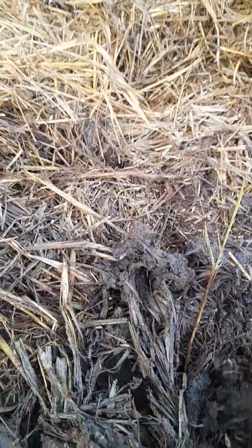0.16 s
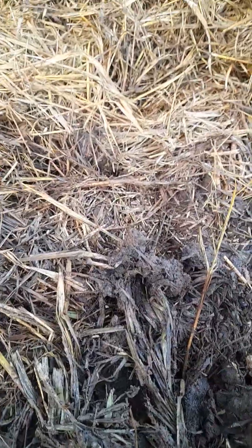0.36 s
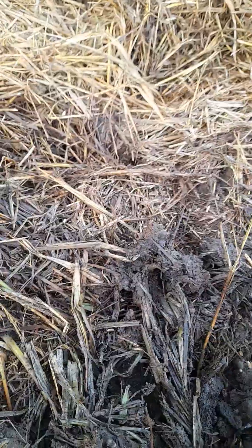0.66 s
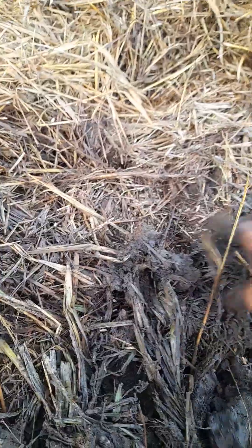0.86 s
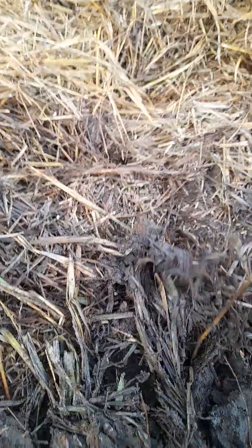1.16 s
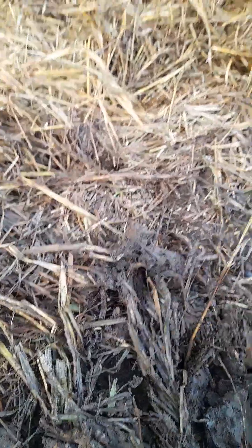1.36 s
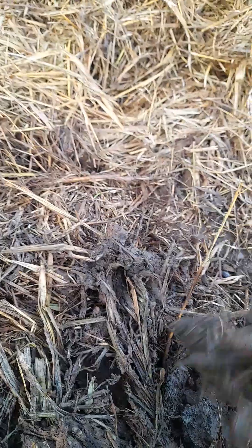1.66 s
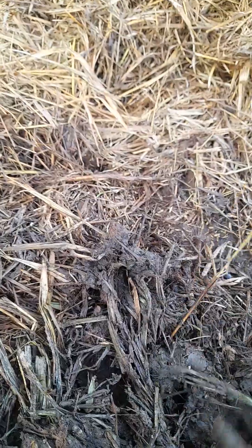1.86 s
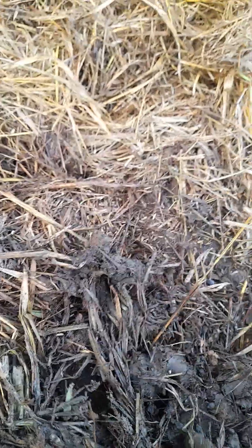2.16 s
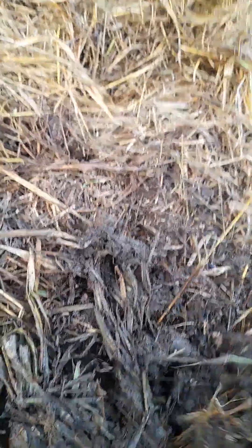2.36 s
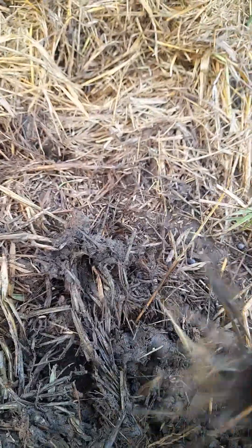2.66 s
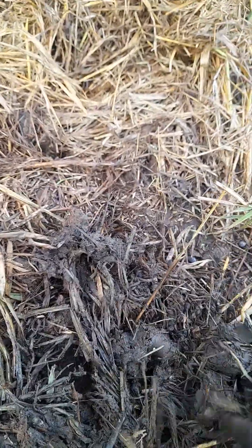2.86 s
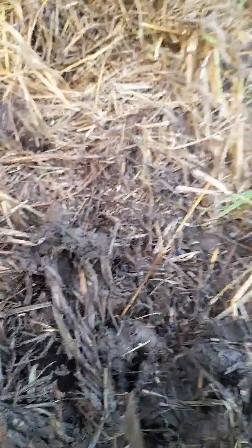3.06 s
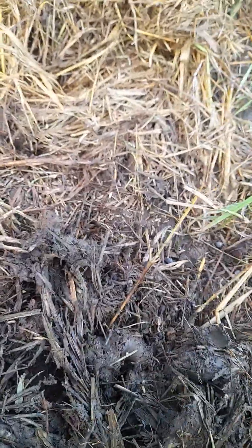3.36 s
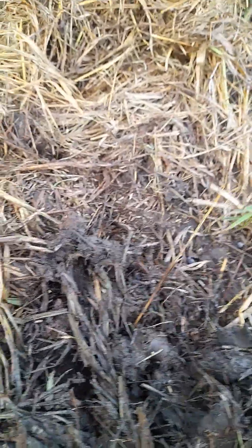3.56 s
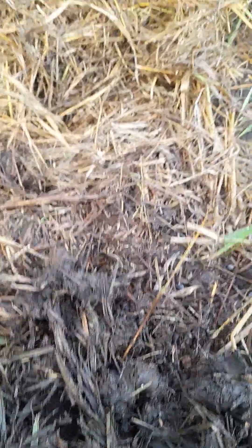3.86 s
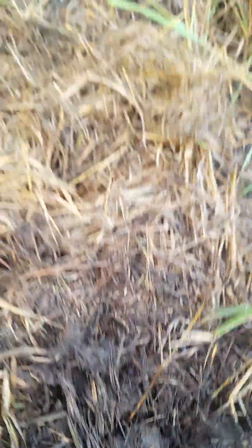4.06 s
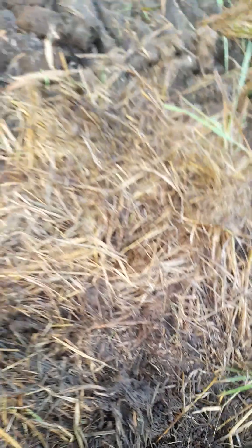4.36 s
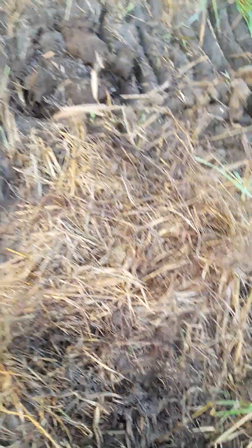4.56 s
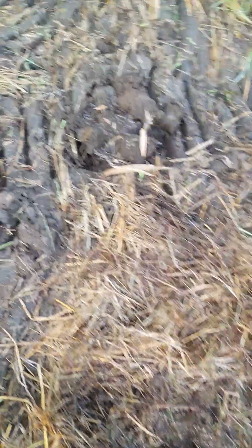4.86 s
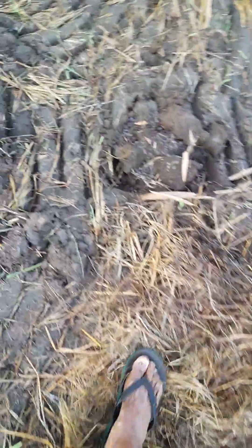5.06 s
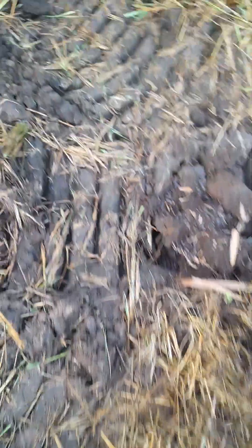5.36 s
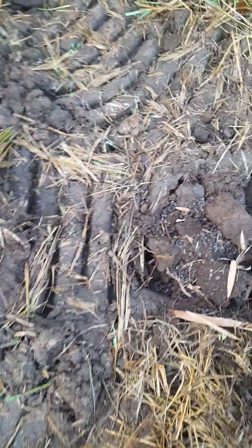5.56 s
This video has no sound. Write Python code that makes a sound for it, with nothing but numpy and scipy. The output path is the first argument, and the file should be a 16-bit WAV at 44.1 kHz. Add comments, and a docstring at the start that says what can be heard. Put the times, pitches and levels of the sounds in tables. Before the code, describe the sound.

Crickets chirp over a faint low engine rumble in a harvested field while muddy straw rustles close by, then stalks snap sharply underfoot.

```python
"""Harvested rice field with crickets and straw

Crickets chirp all around (falling pulse trains and shaped noise) over a far engine (noise and tones).
Someone crouching close by handles muddy straw (shaped noise, ticks, stick-slip resonances), then
steps away; dry stalks snap underfoot and mud pops (struck resonators). Thin squeaks (gliding sines)
and narrow bands of noise (modulated sines) swell and fade faintly."""
import sys
import numpy as np
from scipy import signal
from scipy.fft import rfft, irfft
from scipy.io import wavfile
from scipy.ndimage import uniform_filter1d

SR = 44100
rng = np.random.default_rng(int(sys.argv[2]) if len(sys.argv) > 2 else 0)


def output_pcm(signal):
    """Save a mono or channel-first signal as 16-bit PCM at the path in sys.argv[1].

    Samples are clipped to [-1, 1] before scaling.
    """
    pcm = np.clip(np.atleast_2d(signal).T, -1, 1) * 32767
    wavfile.write(sys.argv[1], SR, np.round(pcm).astype(np.int16))


N = 251456
TIME = np.arange(N) / SR

# In all tables a balance is left minus right; spectra are relative density levels.
# Far rumble, with brief dips, lower once the walk begins: t/s, level/dB
RUMBLE = [(0.0, -47.5), (.66, -44.5), (.83, -51), (.98, -46.5), (2.82, -46.5), (2.96, -50), (3.1, -46.5),
          (3.78, -46), (4.05, -48.5), (5.7, -49)]
# Spectrum of the rumble: f/Hz, density level/dB
RUMBLE_COLOUR = [(25, -57), (31, -41), (39, -9.5), (48, -14), (70, -4), (95, -9), (124, 1), (160, -4.5),
                 (210, -7), (290, -19), (380, -27), (550, -37), (900, -64), (2000, -63.5)]
# Engine tones before their swell: f/Hz, relative level/dB
ENGINE_TONES = [(124, -58), (263.5, -65.5), (330, -67), (397, -82), (463, -77)]
# Swell shared by the engine's tones and wash: t/s, gain/dB
ENGINE_SWELL = [(0, 5.5), (1.2, -0.5), (2.35, 5), (3.1, -4.5), (5.7, -12.5)]
# Spectrum of the engine's diffuse wash: f/Hz, density level/dB
WASH_COLOUR = [(60, -18), (150, -5.5), (300, 12), (390, -3), (500, -3.5), (700, -34), (1500, -25.5)]

# Faint narrow bands of noise that swell and fade: t/s, half length/s, f/Hz, relative level/dB
NOISE_BANDS = [(0.447, 0.17, 2580, -78), (0.89, 0.27, 2264, -84), (1.367, 0.096, 2420, -78),
               (1.707, 0.29, 2890, -75.5), (2.03, 0.11, 1430, -96), (2.895, 0.1, 1387, -84.5),
               (2.938, 0.084, 2930, -75.5), (3.337, 0.22, 2990, -73), (3.844, 0.19, 2850, -75),
               (4.32, 0.11, 2240, -71.5)]
# Thin squeaks: t/s, length/s, start f/Hz, middle f/Hz, end f/Hz, level/dB
SQUEAKS = [(3.255, 0.11, 8420, 9770, 9730, -66.5), (3.467, 0.095, 9820, 9710, 9740, -64),
           (3.49, 0.09, 12800, 12600, 12330, -71), (3.575, 0.04, 9300, 9200, 9500, -63),
           (3.625, 0.05, 9450, 9750, 9980, -66), (3.668, 0.072, 10500, 11380, 10850, -61),
           (5.254, 0.017, 6950, 7280, 7200, -51), (5.335, 0.097, 11200, 12000, 13500, -66),
           (5.415, 0.072, 13450, 13000, 11700, -63), (5.405, 0.075, 11200, 11700, 10800, -69)]
SQUEAK_QUIVER = .009  # rms share of the pitch

# Blurred far crickets: t/s, relative level/dB
CHORUS = [(0.0, -64.5), (1.82, -62), (2.43, -62.5), (4.3, -62.5), (4.78, -59), (5.24, -59.5), (5.7, -58)]
# Spectrum of the far crickets: f/Hz, density level/dB
CHORUS_COLOUR = [(2500, -56), (4100, -16.5), (4600, -5.5), (5000, -1), (5300, -4), (6000, -21.5),
                 (6900, -13.5), (7400, -18), (8150, -8), (8900, -13.5), (9950, -10.5), (10800, -16),
                 (15000, -60)]
# Near crickets, overlapping as they answer one another: centre of last pulse t/s, pulses/1, f/Hz,
# level/dB, fall as share of pitch/1, echo/dB, balance/dB
CHIRPS = [(0.474, 3, 4980, -61, 0.13, 4, 4), (0.551, 4, 5780, -63, 0.12, 1, 4),
          (0.574, 4, 4970, -61.5, 0.13, 6, 0), (0.642, 3, 4950, -68, 0.15, -5, 10),
          (0.81, 3, 4900, -66.5, 0.026, -3, 10), (1.062, 4, 4600, -56.5, 0.23, -8, 5),
          (1.085, 3, 4900, -60, 0.16, -3, 4), (1.33, 2, 4670, -55, 0.27, -2, 3),
          (1.381, 4, 5150, -59.5, 0.21, 5.5, 7), (1.398, 4, 5600, -61, 0.19, 2, 2),
          (1.567, 3, 4560, -55.5, 0.25, 2.5, 3), (1.671, 2, 4950, -59, 0.17, 5, -1),
          (1.695, 3, 5070, -56, 0.19, 3, 2), (1.706, 3, 4820, -54, 0.22, 1, 0),
          (1.722, 3, 5150, -63, 0.25, 1, -4), (1.834, 2, 4650, -57, 0.26, -6, 5),
          (1.915, 3, 4950, -58, 0.23, 4, 1), (2.125, 1, 4950, -55, 0.24, 3, -5),
          (2.186, 2, 4870, -58.5, 0.25, 3, -7), (2.426, 3, 4830, -58, 0.18, -7, -2),
          (2.448, 3, 5550, -67, 0.2, 6, 5), (2.701, 3, 4880, -63, 0.23, -13, -4),
          (2.808, 3, 4980, -61, 0.12, 0.5, 7), (2.895, 3, 4980, -59, 0.12, -3, 3),
          (2.932, 1, 4960, -64, 0.16, -5, 3), (3.154, 3, 4950, -60, 0.15, -1, 0),
          (3.232, 4, 4620, -60, 0.27, 0, 4), (3.468, 2, 4620, -59, 0.26, 1, 3),
          (3.505, 4, 5730, -65, 0.15, 1, 5), (3.572, 4, 4950, -64.5, 0.14, 6, 3),
          (3.705, 3, 4620, -59.5, 0.26, 8, -1), (3.725, 4, 4950, -62, 0.14, 5, 6),
          (3.915, 3, 4950, -65, 0.076, 7, 7), (4.001, 2, 4600, -57, 0.27, -2, -1),
          (4.008, 2, 5080, -63, 0.17, -2, 2), (4.194, 2, 5130, -63, 0.22, -13, 0),
          (4.26, 2, 4990, -57.5, 0.16, -2, 1), (4.453, 4, 4830, -52, 0.32, -4, -7),
          (4.569, 3, 4950, -56.5, 0.13, 0, -9), (4.612, 1, 5000, -49, 0.18, -1, 3),
          (4.726, 3, 4910, -46.5, 0.26, 4, -6), (4.76, 3, 4920, -56.5, 0.12, 8, 3),
          (4.826, 2, 4950, -55, 0.11, -6, -9), (4.868, 1, 4700, -62, 0.17, -1, -14),
          (4.983, 3, 4700, -51.5, 0.25, -5, -8), (5.001, 4, 4880, -46.5, 0.21, -1, -4),
          (5.222, 3, 4750, -50, 0.29, 0.5, -7), (5.446, 2, 4740, -52.5, 0.27, 4.5, 4),
          (5.464, 3, 4880, -48.5, 0.31, -2.5, -6), (5.567, 4, 5580, -59.5, 0.12, 0, 0),
          (5.686, 1, 4700, -53, 0.19, -2, -8)]
PULSE_GAP_S, PULSE_S = .0335, .022  # onset to onset, pulse length
BUILD_UP_DB = 0.96  # the last pulse but one is this much weaker
WING_RASP = .017  # rms share of the pitch
CRICKET_ECHO_DB = -3.0

# Spectrum of the bright rustle: f/Hz, density level/dB
RUSTLE_COLOUR = [(900, -25), (2200, -12.5), (3400, -6), (4600, -4.5), (6300, -7.5), (6900, -6.5),
                 (7350, -8.5), (8100, -0.5), (8900, -2.5), (10020, 5), (10600, .5), (14200, -.5),
                 (15700, -9)]
# Spectrum of the dull shuffle: f/Hz, density level/dB
SHUFFLE_COLOUR = [(200, 5.5), (500, 2.5), (760, 5.5), (1200, 3), (1700, 4.5), (2300, -2), (3300, -4.5),
                  (6000, -24), (15000, -50)]
# Spectrum of the swish of a stroke: f/Hz, density level/dB
SWISH_COLOUR = [(700, -56), (1600, -14), (2400, -0.5), (3100, -8.5), (4000, -2), (5200, -2.5), (7000, -7),
                (14000, -48)]
# Spells of handling straw: start t/s, end t/s, relative rustle level/dB, relative shuffle level/dB
SPELLS = [(0.0, 0.69, -58, -74), (0.938, 1.727, -63, -85), (1.76, 2.83, -61, -78), (3.015, 3.13, -57, -84),
          (3.277, 3.748, -71.5, -77.5), (4.325, 5.015, -75, -87), (4.982, 5.702, -66, -69)]
SPELL_ATTACK_S, SPELL_RELEASE_S = 0.011, 0.021
REST_DB = -79  # relative level of the faint hiss left between spells
# Quick strokes and flicks: centre t/s, Gaussian half width/s, then the relative levels
# rustle/dB, swish/dB, shuffle/dB
STROKES = [(0.632, 0.0038, -56, -83, -99), (1.04, 0.033, -63.5, -71, -71.5),
           (1.193, 0.0015, -53.5, -97, -90), (1.212, 0.0015, -55.5, -74, -91),
           (1.438, 0.001, -51, -61, -71), (1.487, 0.058, -61, -70.5, -75), (1.671, 0.0084, -59.5, -67, -84),
           (1.763, 0.0052, -89, -65, -77), (2.126, 0.02, -51, -66, -83), (2.265, 0.04, -51.5, -57.5, -73),
           (2.849, 0.021, -55.5, -69, -72), (3.05, 0.014, -54.5, -75, -73), (3.41, 0.022, -59.5, -74, -73),
           (3.713, 0.051, -75, -71.5, -78), (4.05, 0.12, -71.5, -74, -72), (4.422, 0.00069, -66, -80, -90),
           (5.145, 0.043, -53, -67.5, -60), (5.631, 0.036, -53.5, -59.5, -78)]
# Feet shuffling on mud while stepping away: t/s, relative level/dB
FOOTWORK = [(4.2, -70), (4.32, -73), (4.722, -60.5), (5.048, -60.5), (5.298, -73.5), (5.7, -63.5)]
STEP_OFF_S = 0.22  # fade-in of the shuffling
# Muddy stalks dragged past each other, resonance sinking: centre t/s, half length/s, start f/Hz,
# end f/Hz, relative level/dB
SCRAPES = [(1.54, 0.088, 3610, 2950, -67.5), (2.143, 0.023, 5560, 4500, -54.5),
           (2.151, 0.046, 2890, 2525, -66), (2.253, 0.0414, 4380, 3940, -58.5),
           (2.278, 0.045, 2500, 2060, -64)]

# Snapping stalks: t/s, level/dB, own f/Hz, low-pass f/Hz, thud relative to the crack/dB, balance/dB
SNAPS = [(3.931, -30.5, 6950, 14000, -24, -15), (3.9318, -18.5, 1890, 13200, 4.5, -5.5),
         (4.051, -52, 2550, 12000, -30, -15), (4.059, -46, 2650, 12000, -30, -13),
         (4.072, -49, 2550, 13000, -30, -14), (4.08, -40, 2560, 13000, -30, -9),
         (4.091, -32.5, 9900, 16000, -36, -8.5), (4.6053, -29.5, 4000, 6600, -32, -10),
         (4.6305, -21, 4200, 4300, -37, -10.5), (4.6316, -29, 1200, 2520, -25, 4.5),
         (4.753, -36, 2530, 12000, -30, -9)]
# Resonant modes of a stalk: f/Hz, relative level/dB, t60/s
STALK = [(555, -9, 0.008), (1000, -7, 0.005), (2100, -2, 0.003), (3750, -11, 0.004), (5050, -7, 0.003),
         (6900, -12, 0.0028), (8150, -12, 0.003), (10200, -3, 0.0018), (11700, -14, 0.0025),
         (14200, -14, 0.0018)]
# Soft pops of wet mud: t/s, level/dB, f/Hz, t60/s
POPS = [(4.113, -46, 1500, 0.004), (4.524, -44, 1290, 0.045), (5.0688, -30.5, 900, 0.005),
        (5.0702, -35, 1450, 0.003)]
OWN_T60_S, TEAR_SHARE = .0033, 0.13
SNAP_ECHO_DB, SNAP_ECHO_T60_S = -19.0, .08
CUTOFF_HZ = 15900


def from_db(db):
    """Logarithmic level: 20 dB is a tenfold amplitude."""
    return 10 ** (np.asarray(db) / 20)


def rms_one(x):
    """Normalisation to unit mean power."""
    return x / np.sqrt(np.mean(x ** 2) + 1e-20)


def in_time(rows):
    """Linear interpolation of each column of a curve at every sample."""
    s, *columns = np.transpose(rows)
    return [np.interp(TIME, s, c) for c in columns]


def panned(balance_db):
    """Interaural level difference: left and right gains."""
    return from_db(np.array([[.5], [-.5]]) * balance_db)


def add(out, s, sound):
    """Superposition of a sound from time s."""
    start = int(np.clip(round(s * SR), 0, N))
    out[..., start:start + sound.shape[-1]] += sound[..., :N - start]


def drift(rate):
    """Slow random modulation: low-passed Gaussian noise of unit spread, corner in Hz."""
    white = rfft(rng.standard_normal(N))
    return rms_one(irfft(white / (1 + (np.fft.rfftfreq(N, 1 / SR) / rate) ** 4), N))


def coloured(x, colour):
    """Spectral shaping: gain interpolated over log frequency."""
    hz, db = np.transpose(colour)
    bins = np.log(np.fft.rfftfreq(N, 1 / SR) + 1)
    gain_db = np.interp(bins, np.log(hz), db, left=db[0] - 11)
    return irfft(rfft(x) * from_db(gain_db), N)


def air_noise(colour, likeness):
    """Interaural correlation: mid and side noises mix to a given likeness of the ears."""
    mid, side = coloured(rng.standard_normal((2, N)), colour)
    alike = np.clip(likeness, -1, 1)
    return rms_one(np.sqrt(1 + alike) * mid + np.sqrt(1 - alike) * side * [[1], [-1]])


def ring(push, hz, t60):
    """Damped resonator: a unit click excites a decaying sine."""
    r, w = from_db(-60 / (t60 * SR)), 2 * np.pi * hz / SR
    return signal.lfilter([0, np.sin(w)], [1, -2 * r * np.cos(w), r * r], push + 1e-18)


def tone(hz):
    """Phase is the integral of frequency: a sine follows a pitch track."""
    return np.sin(2 * np.pi * np.cumsum(hz) / SR)


def stubble(x, echo_db, t60=0.12):
    """Diffuse scattering: stalks and banks add a decaying tail, different at each ear."""
    t = np.arange(SR // 4) / SR
    tail = rng.standard_normal((2, len(t))) * from_db(-60 * t / t60)
    tail = tail / np.sqrt(np.sum(tail ** 2, axis=1, keepdims=True))  # unit energy
    return x + from_db(echo_db) * signal.fftconvolve(x, tail, axes=1)[:, :x.shape[-1]]


def far_engine(wash_db=-63.0, waver=0.00684, flutter_db=4.0):
    """Propagation over distance: a dull rumble, a diffuse wash and a few wavering tones remain."""
    rumble = from_db(in_time(RUMBLE)[0]) * air_noise(RUMBLE_COLOUR, likeness=0.97)
    engine = from_db(wash_db) * air_noise(WASH_COLOUR, likeness=0.0)
    for hz, db in ENGINE_TONES:
        level = from_db(db + flutter_db * drift(6.2))
        engine = engine + level * tone(hz * (1 + waver * drift(3.83)))
    return (rumble + from_db(in_time(ENGINE_SWELL)[0]) * engine) * panned(balance_db=-2.0)


def noise_bands(width_hz=200):
    """Amplitude modulation: low-passed noise on a sine makes a narrow band that swells and fades."""
    low_pass = signal.butter(2, width_hz, fs=SR, output="sos")
    slow_noise = rms_one(signal.sosfilt(low_pass, rng.standard_normal((2, N))))
    carriers = np.zeros(N)
    for s, half, hz, db in NOISE_BANDS:
        swell = np.exp(-((TIME - s) / half) ** 2)
        carriers += from_db(db) * swell * np.sin(2 * np.pi * hz * TIME)
    return 2 * slow_noise * carriers * panned(balance_db=-2.0)


def squeaks():
    """Frequency modulation: faint, very high whistles curve and quiver in pitch."""
    out = np.zeros(N)
    for s, length, *pitches, db in SQUEAKS:
        u = np.linspace(0, 1, int(length * SR))
        hz = np.polyval(np.polyfit([0, .5, 1], pitches, 2), u)  # parabola through three pitches
        shake = rms_one(uniform_filter1d(rng.standard_normal(len(u)), size=60))
        swell = np.sqrt(np.abs(np.sin(np.pi * u)))
        add(out, s, from_db(db) * swell * tone(hz * (1 + SQUEAK_QUIVER * shake)))
    return stubble(np.array([out, out]), echo_db=-1.0)


def cricket_chorus(blur_db=-2.5):
    """Incoherent superposition: the whole field's crickets blur into shaped, fluctuating noise."""
    level = from_db(in_time(CHORUS)[0] + blur_db + 1.8 * drift(29))
    return level * air_noise(CHORUS_COLOUR, likeness=0.0089) * panned(balance_db=-2.0)


def chirp(hz, fall, count=4):
    """Stridulation: each wing closure's tone falls as the wing slows; strokes build up to the last."""
    u = np.linspace(0, 1, int(PULSE_S * SR))
    out = np.zeros(int(((count - 1) * PULSE_GAP_S + PULSE_S) * SR) + 2)
    for k in range(count):
        teeth = rms_one(uniform_filter1d(rng.standard_normal(len(u)), size=24))
        stroke = np.sin(np.pi * u) ** 2 * tone(hz * (1 + fall * (.5 - u) + WING_RASP * teeth))
        add(out, k * PULSE_GAP_S, stroke * from_db(-BUILD_UP_DB * (count - 1 - k) ** 2))
    return out


def far_crickets(far_db=-67.0, far_fall=0.153, count=50):
    """Interaural time difference: faint chirps at random times, each direction with its own lag."""
    field = np.zeros((2, N))
    starts = rng.uniform(0, N / SR, count)
    for s, (pitch, level, side) in zip(starts, rng.standard_normal((count, 3))):
        call = chirp(5000 + 110 * pitch, far_fall)
        ears = np.array([call, np.roll(call, int(8 * side))])
        add(field, s, from_db(far_db + 2 * level) * ears * panned(4 * side - 2))
    return stubble(field, echo_db=CRICKET_ECHO_DB)


def near_crickets():
    """Direct and scattered sound: every near chirp carries its own share of diffuse tail."""
    near = np.zeros((2, N))
    for last, pulses, hz, db, fall, echo_db, balance in CHIRPS:
        call = chirp(hz, fall, count=max(int(round(pulses)), 1)) * from_db(db)
        padded = np.pad(call, (0, SR // 8))  # room for the tail
        heard = stubble(padded * panned(balance), echo_db=echo_db, t60=0.21)
        add(near, last + PULSE_S / 2 - len(call) / SR, heard)
    return near


def high_cricket(level_db=-67.5, pitch_hz=6950, start_s=4.73, pair_gap_s=0.044, inner_gap_s=0.019,
                 count=19):
    """Scaling of stridulation: a smaller cricket trills higher, in pulse pairs that swell and fade."""
    out, u = np.zeros(N), np.linspace(0, 1, int(0.011 * SR))
    for k in range(count):
        swell = np.sqrt(np.sin(np.pi * (k + .5) / count))
        for lag in (0, inner_gap_s):
            hz = pitch_hz * (1 + 0.035 * (u - .5) + rng.normal(0, 0.0075))
            pulse = np.sin(np.pi * u) * tone(hz) * from_db(level_db + rng.normal(0, 4.6))
            add(out, start_s + k * pair_gap_s + lag + rng.normal(0, 0.0016), swell * pulse)
    return stubble(out * panned(balance_db=3.0), echo_db=CRICKET_ECHO_DB)


def shifting(x, depth_db, band_hz=380, frame_s=.012, frames=14):
    """Time-varying spectrum: each narrow band swells and fades by itself."""
    size = 2 * int(frame_s * SR)
    hz, t, spectra = signal.stft(x, SR, nperseg=size)
    chance = rng.standard_normal((len(hz), len(t)))
    chance = uniform_filter1d(chance, size=max(int(frames), 1), axis=1)
    chance = rms_one(uniform_filter1d(chance, size=max(int(band_hz / hz[1]), 1), axis=0))
    return rms_one(signal.istft(spectra * from_db(depth_db * chance), SR, nperseg=size)[1][:, :N])


def tick_sizes(spread_db):
    """Random impulse strength: a capped exponential spread of level."""
    return from_db(spread_db * np.minimum(rng.exponential(1, (2, N)), 3))


def crackle(colour, per_s=130, spread_db=7.5):
    """Shot noise: single fibres slip past each other with tiny random ticks."""
    ticks = tick_sizes(spread_db) * (rng.random(N) < per_s / SR)  # both ears tick together
    return rms_one(coloured(ticks, colour))


def spell(start, end):
    """Envelope of rubbing: a quick linear onset complete at start, then exponential rest after end."""
    attack = np.clip((TIME - start) / SPELL_ATTACK_S + 1, 0, 1)
    return attack * np.exp(-np.maximum(TIME - end, 0) / SPELL_RELEASE_S)


def straw(rustle_db=1.19, dull_rest_db=-77.5, uneven_db=1.74, grain_db=1.13, crackle_db=-10.0):
    """Friction noise: countless fibres rub in a crackling hiss, a duller shuffle and short strokes."""
    bright, dull, strokes = from_db(REST_DB), from_db(dull_rest_db), 0
    pressure = from_db(uneven_db * drift(24.5))
    for start, end, bright_db, dull_db in SPELLS:
        rub = pressure * spell(start, end)
        bright = bright + from_db(bright_db) * rub
        dull = dull + from_db(dull_db) * rub
    for s, half, bright_db, swish_db, dull_db in STROKES:
        sweep = np.exp(-.5 * ((TIME - s) / half) ** 2)
        bright = bright + from_db(bright_db) * sweep
        dull = dull + from_db(dull_db) * sweep
        strokes = strokes + from_db(swish_db) * sweep
    step_off = np.clip((TIME - FOOTWORK[0][0]) / STEP_OFF_S, 0, 1)
    dull = dull + from_db(in_time(FOOTWORK)[0]) * step_off

    fibres = shifting(air_noise(RUSTLE_COLOUR, likeness=0.009), depth_db=2.5, band_hz=470)
    fibres = fibres + from_db(crackle_db) * crackle(RUSTLE_COLOUR)
    rustle = bright * from_db(rustle_db + grain_db * drift(160)) * fibres
    rubbing = shifting(air_noise(SHUFFLE_COLOUR, likeness=-0.071), depth_db=4.0)
    shuffle = dull * from_db(grain_db * drift(16)) * rubbing
    swish_noise = 0.71 * air_noise(SWISH_COLOUR, likeness=0.082)
    swish = strokes * (swish_noise + 0.76 * crackle(SWISH_COLOUR, per_s=600))
    return rustle * panned(-5.0) + shuffle * panned(-3.0) + swish * panned(-13.5)


def scrapes(slips_per_s=900, ring_s=0.0012, spread_db=1.0):
    """Stick-slip friction: every slip rings briefly at the stalk's present pitch."""
    sizes = tick_sizes(spread_db) * (rng.random((2, N)) < slips_per_s / SR)
    clicks = sizes * np.exp(2j * np.pi * rng.random((2, N)))  # random phases
    slips = signal.lfilter([1], [1, -np.exp(-1 / (ring_s * SR))], clicks + 1e-18)
    slips = slips / np.sqrt(np.mean(slips.real ** 2))
    out = np.zeros((2, N))
    for s, half, start_hz, end_hz, db in SCRAPES:
        hz = np.interp(TIME, [s - half, s + half], [start_hz, end_hz])
        carrier = np.exp(2j * np.pi * np.cumsum(hz) / SR)
        out += from_db(db) * np.exp(-((TIME - s) / half) ** 2) * (slips * carrier).real
    return out * panned(balance_db=-5.5)


def snaps(tear_s=0.0034, own_db=4.5, thud_hz=280, thud_t60=0.0013, lag_s=0.000355):
    """Impulsive modal excitation: a crack and tearing fibres ring a stalk, with a thud; mud pops."""
    t = np.arange(SR // 20) / SR
    out, crack = np.zeros((2, N)), 1.0 * (t == 0)
    for s, db, own_hz, bright_hz, thud_db, balance in SNAPS:
        fibres = np.gradient(rng.standard_normal(len(t)))  # fine fibres tear mostly in the treble
        push = crack + TEAR_SHARE * fibres * np.exp(-t / tear_s)
        body = from_db(own_db) * ring(push, own_hz, OWN_T60_S)
        for k, (hz, level, t60) in enumerate(STALK):
            body = body + (-1) ** k * from_db(level) * ring(push, hz, t60)  # alternating signs
        low_pass = signal.butter(2, min(bright_hz, .45 * SR), fs=SR, output="sos")
        body = signal.sosfilt(low_pass, body)
        thud = from_db(thud_db) * ring(crack, thud_hz, thud_t60)
        add(out, s, from_db(db) * (body / np.abs(body).max() + thud) * panned(balance))
    for s, db, hz, t60 in POPS:
        add(out, s, from_db(db) * ring(crack, hz, t60) * panned(balance_db=-7.5))
    # the feet are off to the right, so the left ear hears them later
    ears = np.array([np.interp(TIME - lag_s, TIME, out[0]), out[1]])
    return stubble(ears, echo_db=SNAP_ECHO_DB, t60=SNAP_ECHO_T60_S)


def scene():
    """Linear superposition of the whole field."""
    background = far_engine() + noise_bands() + squeaks()
    insects = cricket_chorus() + far_crickets() + near_crickets() + high_cricket()
    return background + insects + straw() + scrapes() + snaps()


def record(dry):
    """Band limitation: an elliptic low-pass cuts the top steeply."""
    return signal.sosfilt(signal.ellip(12, .1, 70, CUTOFF_HZ, fs=SR, output="sos"), dry)


dry = scene()
out = record(dry)
output_pcm(out)
```